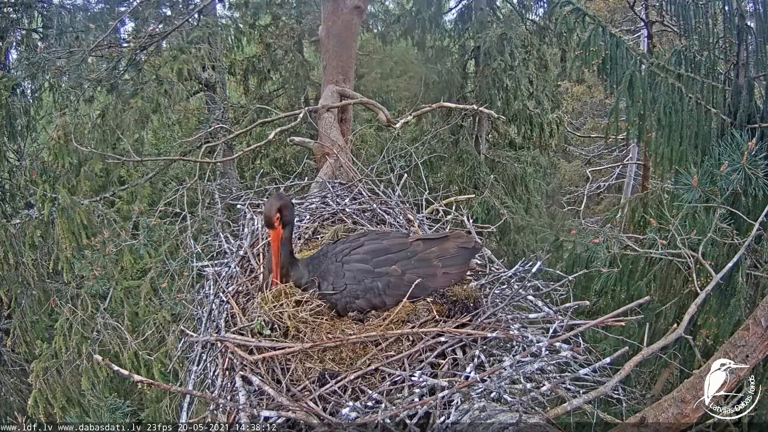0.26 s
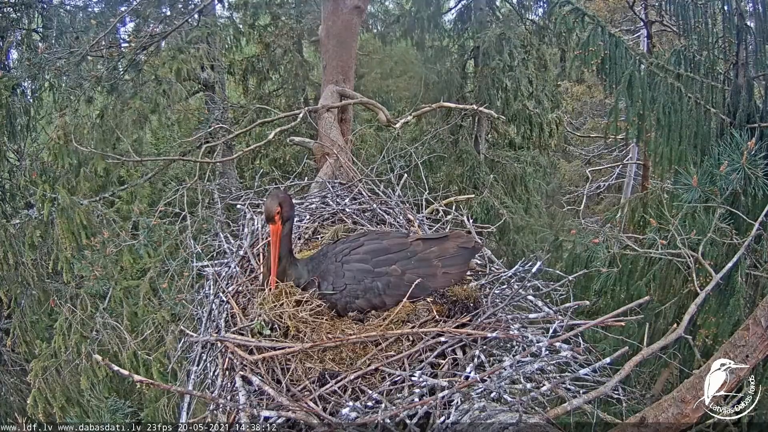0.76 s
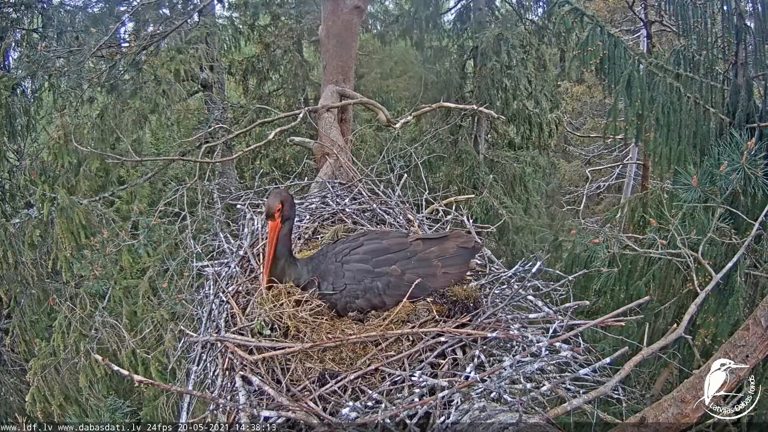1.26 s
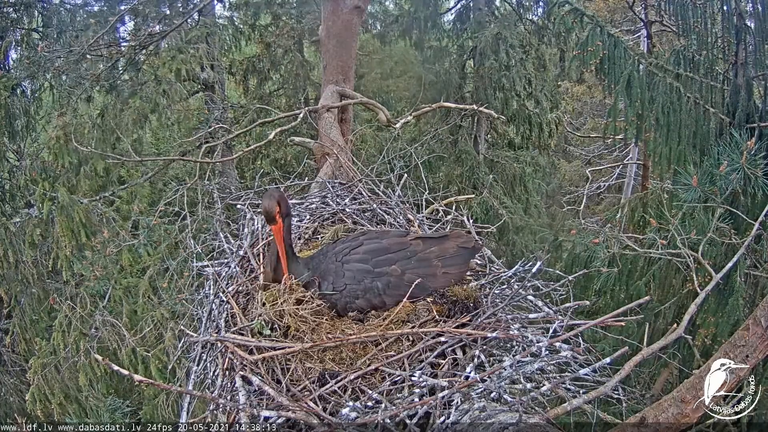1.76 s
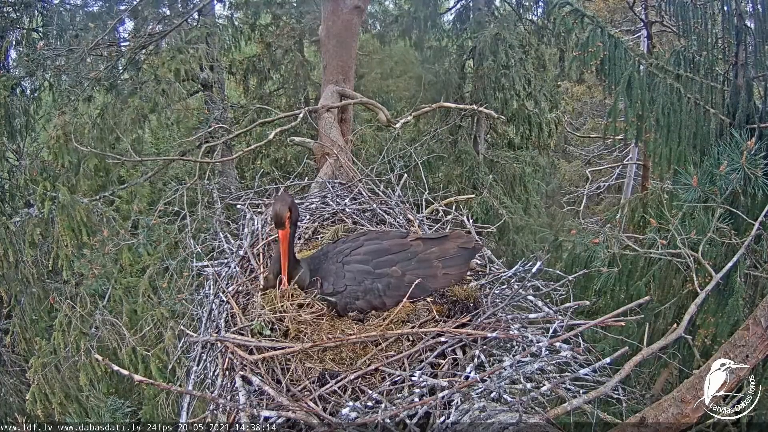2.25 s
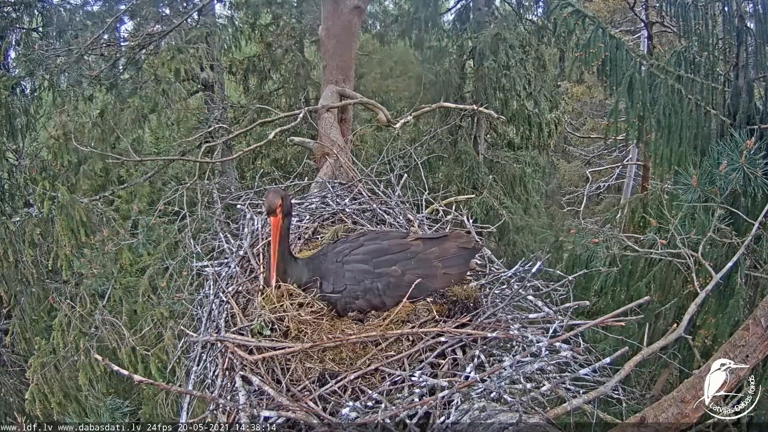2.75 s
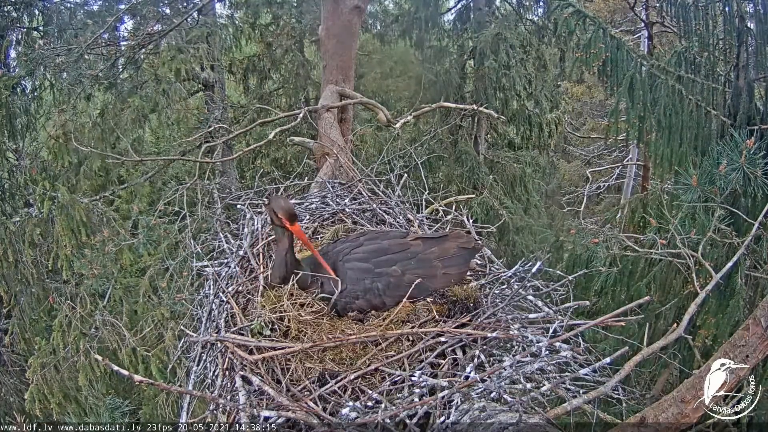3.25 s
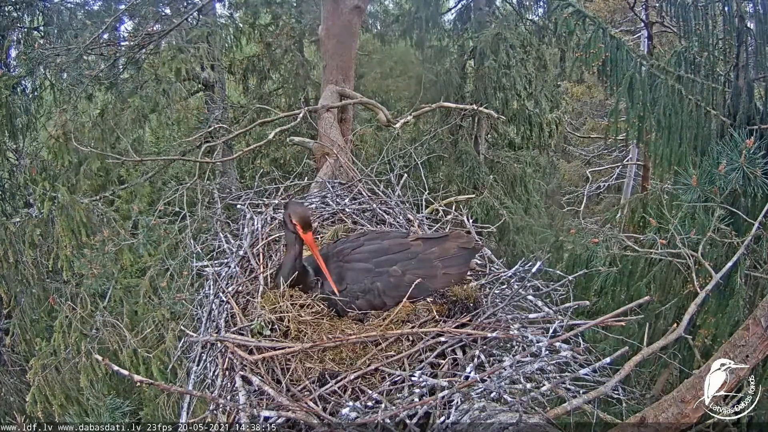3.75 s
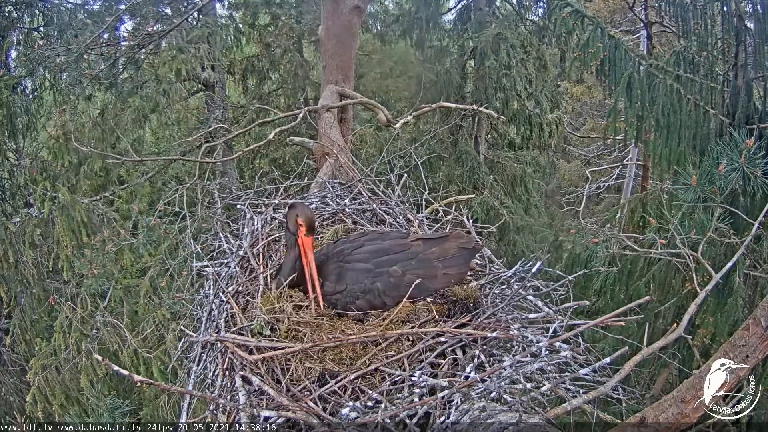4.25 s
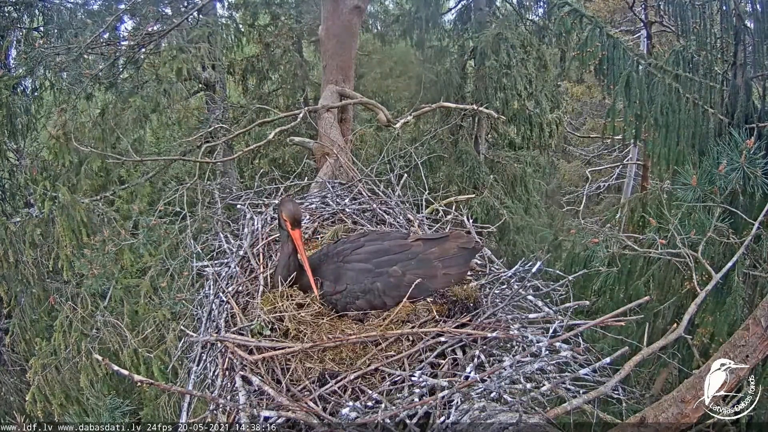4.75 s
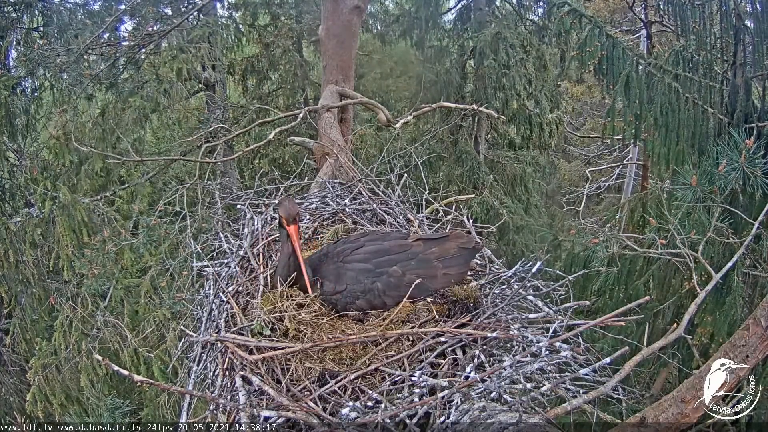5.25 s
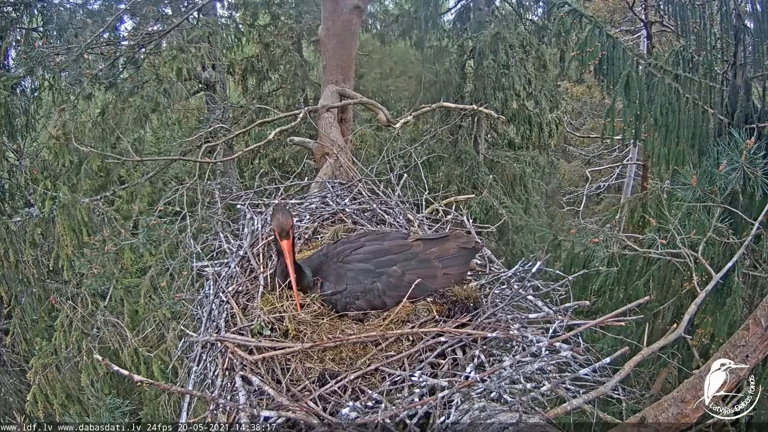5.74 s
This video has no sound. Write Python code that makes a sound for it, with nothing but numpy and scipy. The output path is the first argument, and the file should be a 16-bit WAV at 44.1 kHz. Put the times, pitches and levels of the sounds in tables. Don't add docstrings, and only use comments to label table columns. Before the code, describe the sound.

Quiet forest air with a low moaning rumble and soft hiss, small birds whistling and chirping, two dry twig ticks near the middle.

```python
import sys
import numpy as np
from scipy import signal
from scipy.io import wavfile
from scipy.ndimage import uniform_filter1d

SR = 44100
rng = np.random.default_rng(int(sys.argv[2]) if len(sys.argv) > 2 else 0)


def gain_from_db(level_db):
    decades = np.asarray(level_db, float) / 20
    return 10 ** decades


def to_wav(s):
    ch = np.atleast_2d(s).T
    pcm = np.round(np.clip(ch, -1, 1) * 32767)
    wavfile.write(sys.argv[1], SR, pcm.astype(np.int16))


N = 263718


def evened(x):
    return x / np.sqrt(np.mean(x ** 2) + 1e-20)


def curve(rows):
    t, level = np.transpose(rows)
    return np.interp(np.arange(N) / SR, t, level)


def add(mix, s, sound):
    part = mix[round(s * SR):][:len(sound)]
    part += sound[:len(part)]


def wander(size, rate_hz):
    settle = 8000
    edges = np.array([rate_hz / 4, rate_hz]) / SR * 2
    b, a = signal.butter(1, edges, "band")
    chance = signal.lfilter(b, a, rng.standard_normal(size + settle))[settle:]
    return evened(chance - chance.mean())


def noise(colour, size, patchy_db, frames_wide, bins_wide):
    hz = np.fft.rfftfreq(size, 1 / SR)
    real, imaginary, patches = rng.standard_normal((N * 4 // size + 5, len(hz), 3)).T
    patches = uniform_filter1d(patches, bins_wide, 0)
    patches = evened(uniform_filter1d(patches, frames_wide, 1))
    f, db = np.transpose(colour)
    shape_db = np.interp(np.log(hz + 1), np.log(f + 1), db, -90, db[-1])
    falling_db = db[-1] - 40 * np.log2((hz + 1) / f[-1])
    shape_db = np.where(hz > f[-1], falling_db, shape_db)
    z = (real + 1j * imaginary) * gain_from_db(shape_db[:, None] + patchy_db * patches)
    return evened(signal.istft(z, nperseg=size, noverlap=size * 3 // 4)[1][:N])


def tone(hz, db, flutter_db, flutter_hz, waver):
    hz = hz * (1 + waver * wander(len(hz), flutter_hz))
    level = np.sqrt(2) * gain_from_db(db + flutter_db * wander(len(hz), flutter_hz))
    return level * np.sin(2 * np.pi * np.cumsum(hz) / SR)


def swept(rows, shape):
    out = np.zeros(N)
    for s, length, hz, db in rows:
        t = np.arange(0, length, 1 / SR)
        note = tone(shape(t, t / length, hz), db, flutter_db=2.2, flutter_hz=70, waver=.013)
        add(out, s, note * signal.windows.tukey(len(t), .35))
    return out


def rumble():
    # t/s, level/dB
    swell = [(0, -2), (.2, 0), (.4, 2.5), (.6, 2), (1.8, 1), (2.5, 1.5), (3.3, -1.5), (3.65, -2.5),
             (3.95, 2), (4.3, -3.5), (5.15, 0), (5.6, 4.5), (5.98, 0.5)]
    # f/Hz, density level/dB
    deep_colour = [(12, -4), (30, -1), (55, 2), (85, 1.5), (110, -23)]
    middle_colour = [(75, -14), (98, -4.5), (128, -6.5), (155, -7.5), (190, -14.5)]
    upper_colour = [(140, -18.5), (170, 2.5), (200, 0), (270, -2.5), (370, -13), (480, -35)]
    swell_db = curve(swell)

    def layer(colour, db, follows):
        grain = noise(colour, size=8192, patchy_db=2.5, frames_wide=5, bins_wide=3)
        return gain_from_db(db + follows * swell_db) * grain

    deep = layer(deep_colour, db=-51, follows=0.29)
    middle = layer(middle_colour, db=-51.5, follows=1.22)
    upper = layer(upper_colour, db=-55, follows=0.28)
    recede_db_per_s = -0.8
    recede = gain_from_db(recede_db_per_s * (np.arange(N) - N / 2) / SR)
    return deep * recede + middle + upper


def moans():
    # t/s, length/s, f/Hz, level/dB
    moan_rows = [(0, 0.36, 115, -44.5), (.05, 0.43, 195, -49.5), (.55, 0.34, 82, -49.5),
                 (.75, 0.39, 190, -46.5), (1.4, 0.79, 127, -45.5), (2.05, 0.52, 126, -46),
                 (2.75, 0.39, 132, -50.5), (3.55, 0.13, 165, -48.5), (3.75, 0.362, 185, -53.5),
                 (4.5, 0.65, 100, -52), (5.2, 0.21, 150, -50), (5.4, 0.44, 130, -44),
                 (.45, 0.39, 200, -52.5), (1.15, 0.35, 90, -48), (3.45, 0.31, 62, -48),
                 (5.45, 0.42, 212, -51.5), (2.25, 0.31, 250, -56)]
    sag = 0.036
    out = np.zeros(N)
    for s, length, hz, db in moan_rows:
        u = np.linspace(0, 1, int(length * SR))
        moan = tone(hz * (1 + sag * (.5 - u)), db, flutter_db=3.5, flutter_hz=6.3, waver=0.0313)
        add(out, s, moan * np.sin(np.pi * u))
    return gain_from_db(-3.0) * out


def air():
    # f/Hz, density level/dB
    wash_colour = [(220, -5), (380, 1), (514, -1), (652, -2), (1480, -8.5), (2300, 0.5), (3740, -15.5),
                   (5000, -26.5), (6500, -27), (11000, -120)]
    # t/s, level/dB
    wash_swell = [(0, -0.5), (1.3, 0.4), (2.4, 0.3), (3.3, 0.26), (4.1, -0.04), (5.1, -0.5), (5.98, 0)]
    wash = noise(wash_colour, size=1024, patchy_db=1.0, frames_wide=10, bins_wide=8)
    return gain_from_db(-56.8 + curve(wash_swell)) * wash


def hiss():
    # f/Hz, density level/dB
    hiss_colour = [(200, -0.8), (4000, -0.79), (8000, -0.43), (11500, -0.72)]
    return gain_from_db(-64) * noise(hiss_colour, size=1024, patchy_db=0.48, frames_wide=4, bins_wide=100)


def chorus(count=260):
    out = np.zeros(N)
    for when, pitch, glide, length, softness in rng.random((count, 5)):
        u = np.linspace(0, 1, int((0.018 + 0.116 * length) * SR))
        hz = (1900 + 1900 * pitch) * (1 + 0.25 * (glide - .5) * u)
        db = -73 - 9 * pitch - 5 * softness
        note = np.sin(2 * np.pi * np.cumsum(hz) / SR) * np.hanning(len(u))
        add(out, when * N / SR, gain_from_db(db) * note)
    return out


def pips():
    # t/s, length/s, f/Hz, level/dB
    low_singer = [(0.72, .035, 2230, -56), (0.85, .08, 1780, -68), (0.88, 0.034, 2470, -60),
                  (1.87, 0.03, 2260, -55.5), (2.04, .05, 2055, -61), (2.07, .03, 2800, -63),
                  (2.525, .04, 2760, -71), (2.641, .05, 1810, -68), (2.96, .08, 2550, -60),
                  (3.07, 0.021, 2456, -55), (3.215, 0.057, 2070, -59), (3.81, .04, 2850, -66),
                  (3.844, 0.019, 2464, -54), (3.996, 0.048, 2240, -54.5), (4.205, .03, 2720, -62),
                  (5.4, 0.11, 1883, -64), (5.499, 0.11, 2360, -61), (5.873, .1, 2323, -61)]
    high_singer = [(1.43, 0.11, 3380, -65), (2.022, 0.037, 3100, -64), (2.469, 0.065, 3300, -67),
                   (3.0, .03, 4220, -71), (3.218, 0.035, 3220, -65), (3.69, .04, 3490, -66),
                   (3.86, 0.11, 3230, -68), (4.663, 0.09, 3400, -67), (4.73, .056, 3320, -67),
                   (4.92, 0.045, 3820, -68), (5.1, .05, 3700, -68), (5.274, 0.038, 3745, -64.5),
                   (5.442, .05, 3400, -64), (5.52, .03, 3560, -70), (5.663, 0.066, 3340, -67),
                   (5.721, 0.056, 3520, -66), (5.802, 0.071, 3440, -67), (5.889, 0.054, 3400, -66)]

    def level_pitch(t, u, hz):
        return np.full(len(t), float(hz))

    return swept(low_singer, level_pitch) + swept(high_singer, level_pitch)


def whistles():
    # t/s, length/s, entry f/Hz, held f/Hz, level/dB
    whistle_rows = [
        (1.015, .475, 2085, 2180, -50.5),
        (2.17, .34, 2210, 2270, -56.5),
        (3.93, .4, 3230, 3048, -60),
    ]
    wavers = (.007, .022, .004)
    tires_db_per_s = (-22, -12, -2)
    settle_s, ease_in_s = .055, .08
    out = np.zeros(N)
    for (s, length, entry_hz, held_hz, db), waver, tire in zip(whistle_rows, wavers, tires_db_per_s):
        t = np.arange(0, length, 1 / SR)
        hz = held_hz + (entry_hz - held_hz) * np.exp(-t / settle_s)
        note = tone(hz, db + tire * t, flutter_db=3.2, flutter_hz=45, waver=waver)
        add(out, s, note * np.minimum(t / ease_in_s, 1) * signal.windows.tukey(len(t), .15))
    return out


def rising_chirps():
    # t/s, length/s, start f/Hz, level/dB
    rises = [
        (1.96, .04, 2300, -63),
        (4.62, .04, 2030, -58),
        (4.992, .036, 2050, -54.5),
    ]
    rise_hz_per_s = 10000
    return swept(rises, lambda t, u, hz: hz + rise_hz_per_s * t)


def twigs():
    # t/s, peak level/dB, ring f/Hz
    ticks = [
        (2.4933, -35.5, 2960),
        (2.4964, -32, 2100),
        (2.8034, -32, 2680),
        (2.8047, -48, 2300),
        (2.806, -35, 2016),
    ]
    out, t = np.zeros(N), np.arange(600) / SR
    for s, db, hz in ticks:
        ring = np.sin(2 * np.pi * hz * t) * gain_from_db(-60 * t / .006)
        push = .7 * np.sin(2 * np.pi * 1050 * t) * gain_from_db(-60 * t / .005)
        onset = 1 - np.exp(-t / 0.00046)
        add(out, s, gain_from_db(db) * (ring + push) * onset)
    return out


def arched_calls():
    # t/s, length/s, top f/Hz, level/dB
    arches = [
        (3.03, .06, 3020, -60),
        (3.335, .085, 3120, -63),
        (3.7, .065, 2920, -59),
        (5.222, .065, 3330, -63),
    ]
    depth = .17
    return swept(arches, lambda t, u, hz: hz * (1 - depth * abs(2 * u - 1) ** 1.45))


def falling_chirps():
    # t/s, length/s, start f/Hz, level/dB
    falls = [(3.628, 0.06, 3650, -69), (3.668, 0.047, 2800, -62), (3.824, 0.035, 2630, -54),
             (4.192, 0.019, 2900, -53), (4.245, .018, 2880, -62), (4.45, 0.079, 4400, -69),
             (4.66, .05, 4250, -70), (4.862, 0.05, 2720, -58.5), (4.91, .02, 1890, -58),
             (5.554, 0.049, 3390, -60), (5.6, .02, 3150, -65), (5.77, .05, 3240, -61.5)]
    fall_hz_per_s = 12500
    return swept(falls, lambda t, u, hz: hz - fall_hz_per_s * t)


def forest(x, t60):
    at = np.arange(120, SR, 20)
    taps = np.zeros(SR + 20)
    signs = rng.choice([-1., 1.], len(at))
    taps[at + rng.integers(0, 20, len(at))] = signs * gain_from_db(-60 * at / SR / t60)
    return signal.fftconvolve(x, taps / np.linalg.norm(taps))[:N]


def scene():
    floor = rumble() + moans() + air() + hiss()
    birds = pips() + whistles() + rising_chirps() + arched_calls() + falling_chirps()
    song, wood = chorus() + birds, twigs()
    leaves = gain_from_db(-7) * forest(song, t60=.12)
    trunks = gain_from_db(-11) * forest(song, t60=.7)
    wood_echo = gain_from_db(-4.5) * forest(wood, t60=0.19)
    return (gain_from_db(-2.5) * (song + leaves) + wood + trunks + wood_echo + floor)[None]


def treble_gaps(x, above_hz=3900, share=.012):
    hz, t, z = signal.stft(x, SR, nperseg=1024, noverlap=768)
    chance = uniform_filter1d(rng.standard_normal(z.shape), size=5, axis=1)
    chance = uniform_filter1d(chance, size=15, axis=2)
    empty = (chance > np.quantile(chance, 1 - share)) & (hz[:, None] > above_hz)
    gain = np.where(empty, gain_from_db(-22), 1)
    return signal.istft(z * gain, SR, nperseg=1024, noverlap=768)[1][:, :N]


def band_limit(x):
    lowpass = signal.firwin(1023, 12160, window=("kaiser", 9), fs=SR)
    return signal.oaconvolve(x, lowpass[None], "same")


def stream_faults(x):
    skip_s, lost_s = 2.69556, .0011
    break_from_s, break_to_s = 2.62757, 2.63147
    at, lost = round(skip_s * SR), round(lost_s * SR)
    mirrored_end = x[:, -lost:][:, ::-1]
    x = np.concatenate([x[:, :at], x[:, at + lost:], mirrored_end], 1)
    on = np.ones(N)
    on[round(break_from_s * SR):round(break_to_s * SR)] = 0
    return x * uniform_filter1d(on, size=2)


def top_cut(x):
    return signal.sosfilt(signal.butter(12, 16000, fs=SR, output="sos"), x)


def record(dry):
    offset = 0.013
    x = band_limit(treble_gaps(dry)) + offset
    return top_cut(stream_faults(x))


dry = scene()
out = record(dry)
to_wav(out)
```